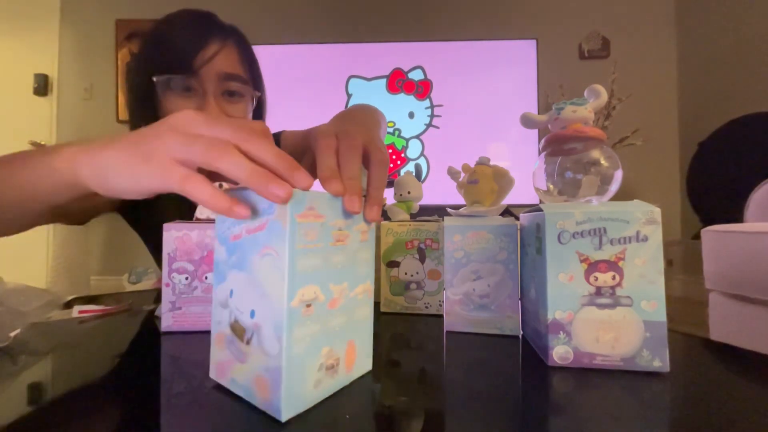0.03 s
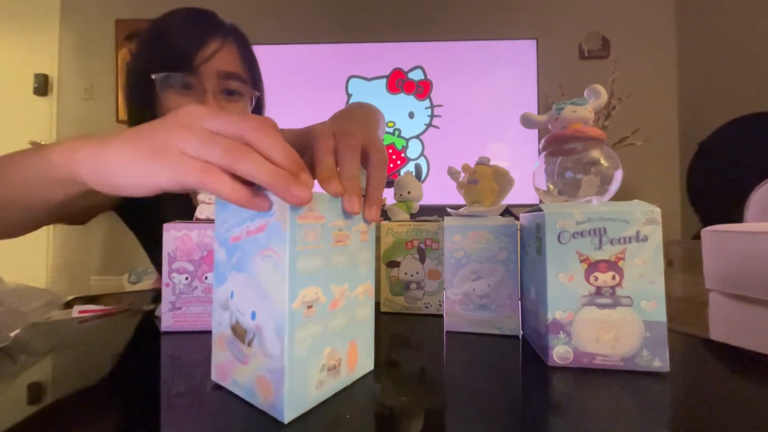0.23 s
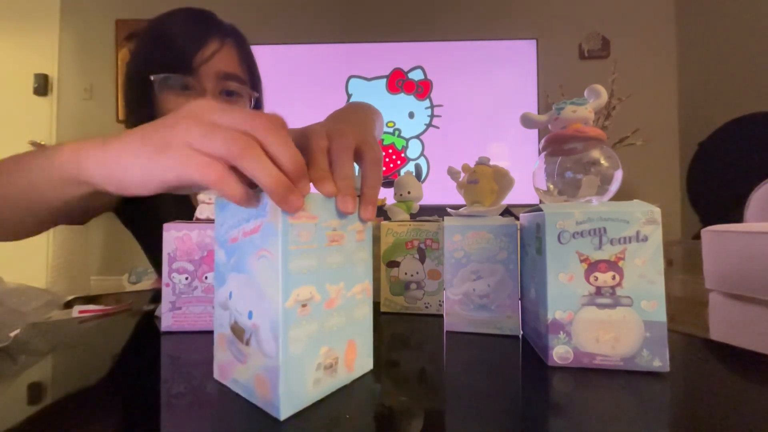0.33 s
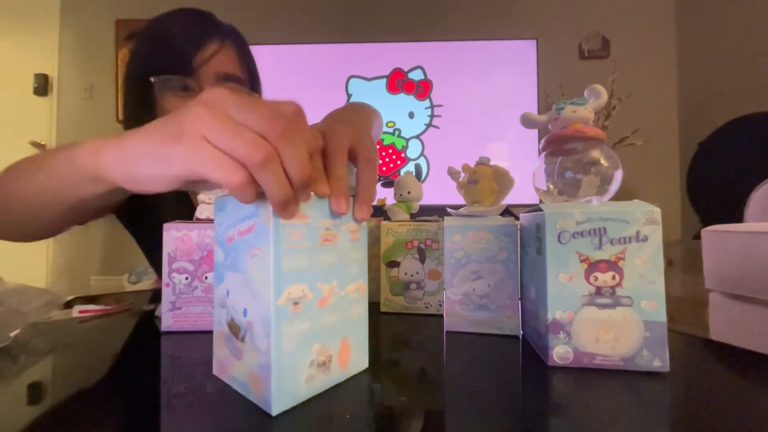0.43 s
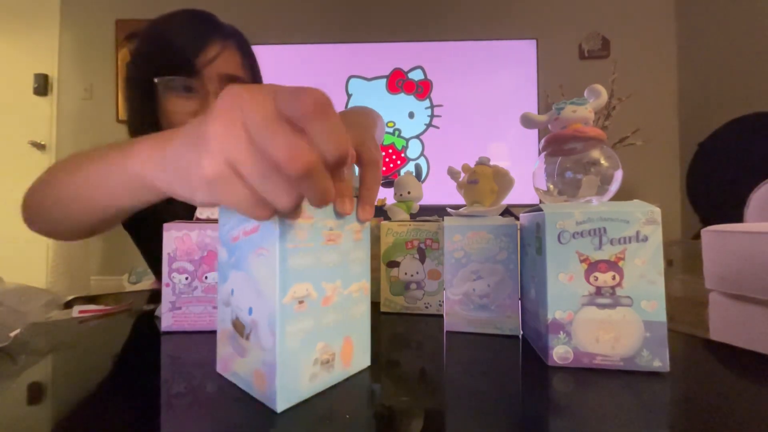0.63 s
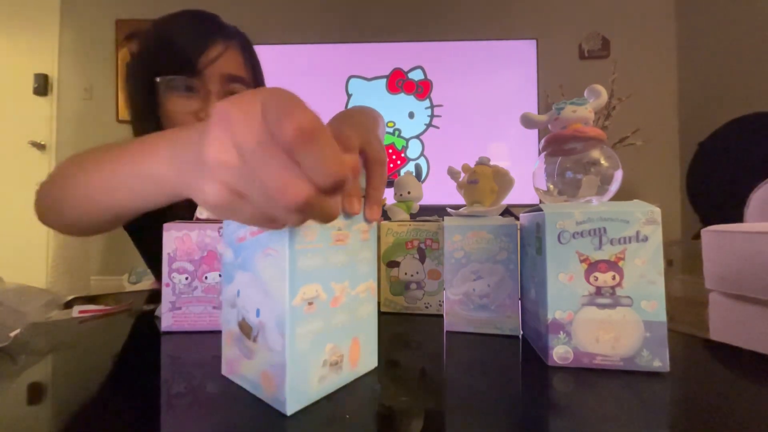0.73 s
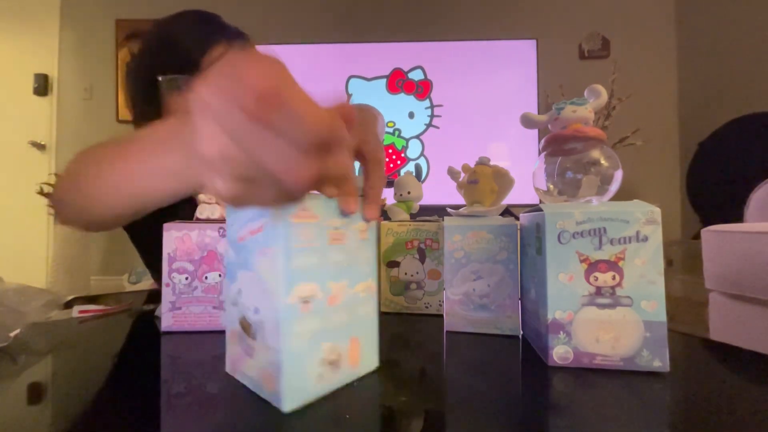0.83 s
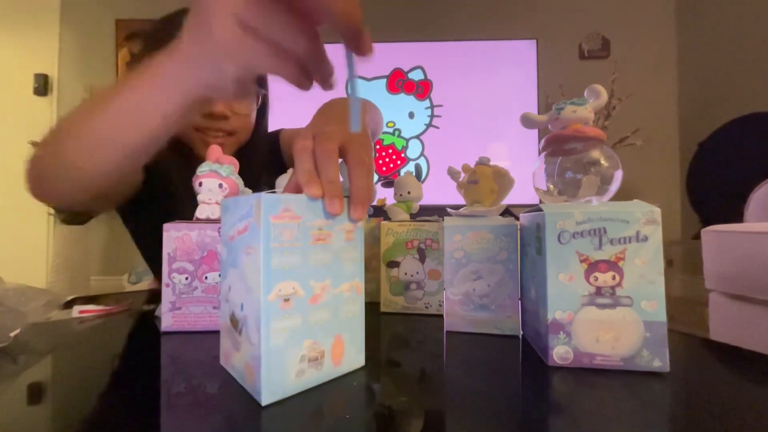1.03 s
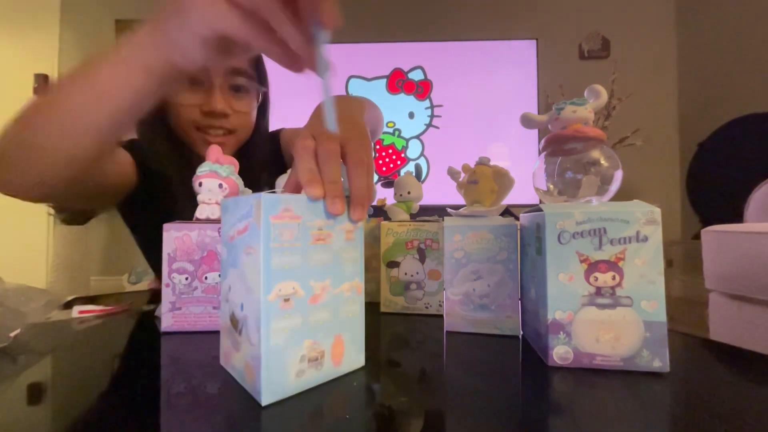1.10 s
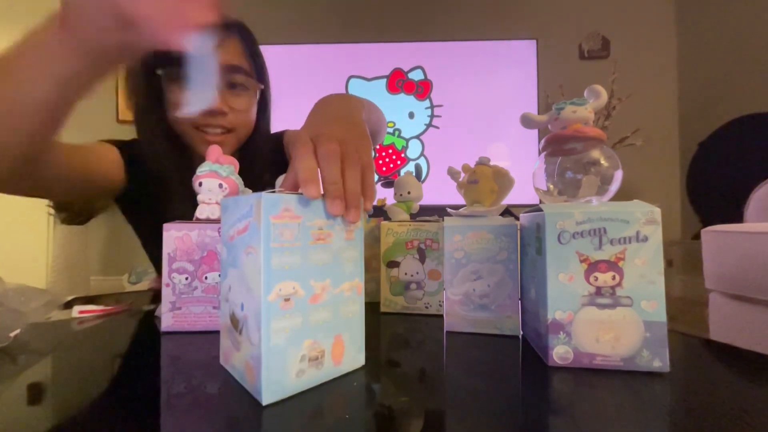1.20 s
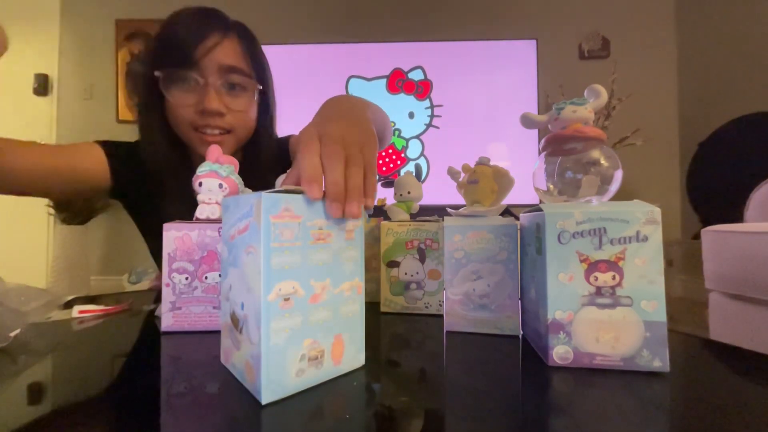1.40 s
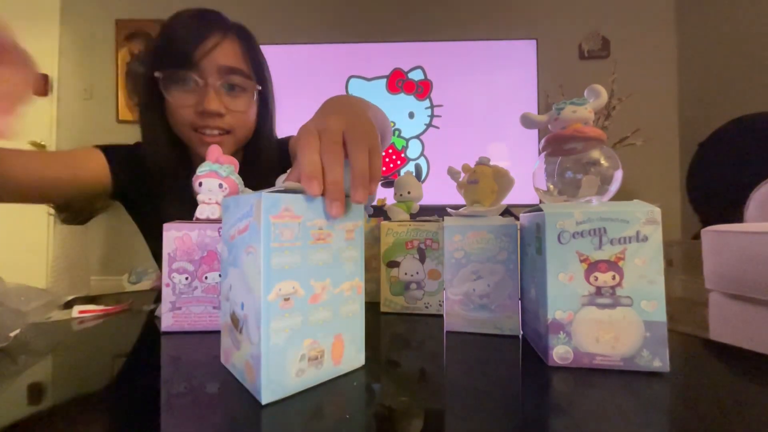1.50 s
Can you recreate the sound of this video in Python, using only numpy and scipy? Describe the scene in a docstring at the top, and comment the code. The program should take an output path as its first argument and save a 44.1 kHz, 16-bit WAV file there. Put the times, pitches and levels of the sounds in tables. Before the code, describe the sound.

Cardboard rips close to the microphone as a strip is pulled from a hollow box on a table. The tearing ends in a snap, followed by light finger taps and soft rubbing over a low room hush.

```python
"""A faint tick on card, then a close, purring rip: the pull tab tears off a small box on a table.
The strip sticks and slips about a hundred times a second; each slip thumps the hollow box while
fibres crackle. The end of the strip breaks free with a snap, then fingers tick and rub lightly
on the card over the low hush of a small room."""
import sys
import numpy as np
from scipy import signal
from scipy.fft import rfft, irfft
from scipy.io import wavfile
from scipy.ndimage import uniform_filter1d

SR = 44100
rng = np.random.default_rng(int(sys.argv[2]) if len(sys.argv) > 2 else 0)


def bounce(signal):
    """Save signal as a 16-bit WAV file at the path given by the first command-line argument."""
    frames = np.transpose(np.atleast_2d(signal))
    limited = np.clip(frames, -1, 1)
    pcm = np.round(limited * 32767).astype(np.int16)
    wavfile.write(sys.argv[1], SR, pcm)


N = 68355
T = np.arange(N) / SR

# tone of the room's air, early reflections and tail: (frequency [Hz], gain [dB])
HUSH_EQ = [(25, -16), (60, -12), (115, -8), (155, -22), (220, -15), (300, -17), (410, -22.5), (800, -33.5),
           (1350, -34), (1540, -31), (1800, -39), (2600, -51), (3900, -45), (5500, -63.5), (11600, -61),
           (14300, -70)]
EARLY_EQ = [(100, -12.5), (600, -22), (1500, -11.5), (3000, 1.5), (6000, -7.5), (12000, -10)]
TAIL_EQ = [(60, -23), (250, -14.5), (600, -15), (1200, -18), (2500, -14.5), (6000, -10.5), (12000, -7)]
# decay of the tail: (frequency [Hz], t60 [s])
TAIL_DECAY = [(100, .4), (300, 0.25), (700, 0.25), (2000, 0.4), (6000, 0.24), (12000, 0.24)]
# pan of the box: (frequency [Hz], left over right [dB])
PAN = [(60, -1), (200, -1), (370, 1.5), (520, 8), (700, 17), (1230, 6), (2260, 0), (4140, 15), (7580, -2),
       (13900, -0.5)]
# finger strokes on the card: (start [s], length [s], level [dB])
STROKES = [(1.145, 0.091, -59.5), (1.401, 0.076, -50.5), (1.483, 0.13, -53)]
# tone of skin on card: (frequency [Hz], gain [dB])
RUB_EQ = [(30, -18), (70, -4), (115, 5.5), (200, 0.5), (500, -3.5), (1000, -6.5), (2000, -16.5),
          (4000, -22), (8000, -32), (14000, -67)]
# resonances of the box: (frequency [Hz], relative level [dB], t60 [s])
BOX_MODES = [(92, -20, .11), (228, 1, 0.093), (327, -4.5, 0.043), (454, -13, .045), (535, -7, 0.057),
             (596, 6.5, 0.027), (742, 1, 0.023), (970, 4.5, 0.019), (1136, -4, 0.013), (1296, 6.5, 0.021),
             (1520, -39, 0.018), (1970, 2, 0.033), (2060, -5.5, 0.029), (3020, 1, .015), (3820, 1, 0.022)]
# hits from fingers and nails, and from bridges of card breaking along the strip:
# (time [s], gain [dB], centre [Hz], spread [octaves], crack mix [dB], thump mix [dB])
FINGER_TAPS = [(.018, -52.5, 2500, 1.2, 1, -10), (1.097, -38, 469, 0.14, -21, -18),
               (1.1405, -39.5, 790, 1.2, -20, -14), (1.145, -40, 303, 0.36, -35, -15),
               (1.1855, -38.5, 900, 0.53, -13, -15), (1.190, -42, 300, 0.65, -44, -17),
               (1.2622, -35, 1740, 0.98, -19, -32), (1.2645, -36.5, 480, 0.15, -40, -33.5),
               (1.4075, -28.5, 1700, 1.46, -17.5, -17), (1.4088, -28, 787, 0.3, -14, -23),
               (1.417, -42, 139, 0.78, -28, -1.5), (1.4265, -67, 1200, 1.3, -7, -8),
               (1.4680, -23, 1400, 1.3, -13.5, -33.5), (1.4715, -28.5, 405, 0.49, -30, -13),
               (1.499, -33.5, 610, 0.96, -19, -10), (1.526, -33, 524, 0.59, -24, -30),
               (1.546, -27.5, 2260, 0.74, -8.5, -23)]
BRIDGE_SNAPS = [(.115, -55, 900, 1, -19, -18), (.1665, -30, 890, 1.1, -6, -9),
                (.1712, -35, 455, 0.65, -9, -11), (.1932, -27.5, 500, 0.63, 0.5, -15),
                (.2345, -28.5, 800, 0.81, -4.5, -19), (.2608, -34, 800, 1.2, -23, -14),
                (.2672, -18.5, 450, 1.2, -7.5, -10.5), (.2728, -16.5, 202, 0.66, -42, -23),
                (.3488, -10, 600, 1, -18, -19), (.3645, -25, 800, 1, -15, -23),
                (.4412, -25, 1200, 1, -8, -16), (.4718, -13, 400, 0.71, -19, -9),
                (.6075, -23, 900, 0.82, -5, -33), (.6198, -18.5, 600, 1.15, -6.5, -10),
                (.8150, -19, 1700, 0.43, -9, -7), (.8182, -6, 1323, 0.44, -12, -49.5),
                (.8222, -10, 850, 0.4, -16.5, -20), (.8260, -0.5, 560, 0.8, -64, -25.5)]
# fader moves of the rip, ahead of the trims: (time [s], crackle [dB], rasp [dB], boom [dB])
RIP_FADERS = [(.1,-75,-61,-69), (.116,-55.5,-55,-58), (0.133,-57,-49,-55), (0.157,-68,-60,-56),
              (0.169,-47.5,-36.5,-68), (0.184,-53,-32.5,-32), (.196,-49.5,-32.5,-31.5),
              (.212,-73,-47.5,-45), (0.223,-62,-59.5,-46), (.238,-48,-35,-27.5), (.252,-69,-52,-57),
              (.261,-45,-29,-33), (.27,-40.5,-26,-19.5), (.286,-54,-38,-23), (0.299,-48.5,-28,-24),
              (.336,-55,-44.5,-32.5), (0.348,-36.5,-26,-24.5), (0.383,-47,-28,-21.5),
              (.428,-49.5,-37,-27.5), (.446,-46.5,-27.5,-26.5), (0.461,-46,-39.5,-32),
              (0.47,-45.5,-29.5,-23.5), (.516,-50.5,-29,-23.5), (0.535,-49,-35.5,-29.5),
              (.58,-46.5,-28.5,-21.5), (.604,-45.5,-35,-30), (.622,-49,-29,-31), (.636,-55,-41,-36.5),
              (.685,-58.5,-46.5,-39.5), (.73,-64,-47.5,-43), (.764,-71,-57,-45), (.775,-47.5,-37.5,-40),
              (.79,-61.5,-42.5,-37), (.81,-47,-39,-38.5)]
# speed of the pull: (time [s], rate [slips/s])
PULL_SPEED = [(.16, 95), (.28, 87.3), (.33, 75), (.36, 130), (.42, 109.2), (.51, 114), (.58, 85.2),
              (.66, 100), (.8, 85)]
# tone of the box's boom, the card's rasp and the fibres' crackle: (frequency [Hz], gain [dB])
BOOM_EQ = [(25, -51.5), (55, -2.5), (85, -1.5), (118, -1), (148, 1), (185, 0.5), (245, 0.5), (310, -8.5),
           (370, -16.5), (600, -34.5), (1500, -59.5)]
RASP_EQ = [(150, -19.5), (350, -4.5), (430, 2), (505, 2.5), (590, -2.5), (715, 1.5), (830, -5.5),
           (980, -12), (1270, -6), (1480, -15.5), (1720, -11.5), (2120, -14.5), (2540, -40), (5000, -54)]
CRACKLE_EQ = [(500, -31), (1800, 6.5), (2550, -2), (3300, 1), (3700, -0.5), (5200, 0), (6200, 0.5),
              (8000, -7), (10200, -14.5), (12500, -27), (14500, -57)]

HUSH_DB, EARLY_DECAY_S, RIGHT_LATE_S = -57.5, 0.0017, 0.0001
CONTACT_S, CRACK_RISE_S, CRACK_DECAY_S, THUMP_HZ, THUMP_DECAY_S = 0.00034, 0.00023, 0.0017, 96.7, 0.015
SLIP_JITTER_PERIODS, SLIP_SPREAD_DB, SLIP_DECAY_S = 0.097, 1.6, 0.0065
FIBRES_PER_S, FIBRE_SPREAD_DB, CLUMP_DB, CLUMP_S = 9000, 3.5, 2.5, 0.003
BOOM_TRIM_DB, CRACKLE_TRIM_DB, SIDE_RASP_TRIM_DB, SIDE_CRACKLE_TRIM_DB = -1.5, 0.5, -21, -10


def amp(db):
    """Decibels to gain."""
    return 10 ** (np.asarray(db) / 20)


def unit_rms(x):
    """Scales to rms 1."""
    return x / np.sqrt(np.mean(x ** 2) + 1e-20)


def curve_at(points, hz):
    """Reads a curve on a log-frequency axis."""
    f, value = np.transpose(points)
    return np.interp(np.log(hz + 1), np.log(f + 1), value)


def add(mix, start_s, sound):
    """Drops a sound into the mix."""
    part = mix[round(start_s * SR):][:len(sound)]
    part += sound[:len(part)]


def eq(x, points, size=8192):
    """Minimum-phase equaliser that follows a gain curve."""
    log_gain = np.log(amp(curve_at(points, abs(np.fft.fftfreq(size, 1 / SR)))))
    spectrum = np.exp(np.conj(signal.hilbert(log_gain)))
    impulse = np.fft.ifft(spectrum).real[:size // 2]
    return signal.fftconvolve(x, impulse)[:len(x)]


def room_hush(width=0.28):
    """The bed: a low, steady murmur of air, in stereo."""
    mid, side = (unit_rms(eq(noise, HUSH_EQ)) for noise in rng.standard_normal((2, N)))
    return amp(HUSH_DB) * np.array([mid + width * side, mid - width * side])


def room_echo(x, predelay_s=0.0025, echoes_per_s=4000):
    """Quick reflections off the table and nearby boxes, then a short tail, for one ear."""
    t = T[:SR // 2]
    near, far = rng.choice([-1., 1.], (2, len(t))) * (rng.random((2, len(t))) < echoes_per_s / SR)
    early = near * np.exp(-t / EARLY_DECAY_S)
    hz, times, bands = signal.stft(far * (t > predelay_s), SR, nperseg=256)
    decay = amp(-60 * times / curve_at(TAIL_DECAY, hz)[:, None])
    tail = signal.istft(bands * decay, SR, nperseg=256)[1][:len(t)]
    impulse = eq(early / np.linalg.norm(early), EARLY_EQ) + eq(tail / np.linalg.norm(tail), TAIL_EQ)
    return signal.fftconvolve(x, impulse)[:N]


def finger_rubs(grains_per_s=2500):
    """Fingers slide over the card in short, grainy strokes."""
    envelope = np.zeros(N)
    for start_s, length_s, db in STROKES:
        add(envelope, start_s, amp(db) * np.sqrt(np.hanning(round(length_s * SR)).clip(0)))
    grains = rng.standard_normal(N) * (rng.random(N) < grains_per_s / SR)
    return envelope * unit_rms(eq(grains, RUB_EQ))


def box_hit(db, centre_hz, octaves, crack_db, thump_db):
    """A short crack rings the box's modes around a centre pitch and rocks the box on the table."""
    t = T[:SR // 5]
    hz, mode_db, t60 = np.transpose(BOX_MODES)[:, :, None]
    weight = amp(mode_db) / (1 + (np.log2(hz / centre_hz) / octaves) ** 4)
    modes = weight * amp(-60 * t / t60) * np.sin(2 * np.pi * hz * t)
    ring = modes.sum(0) / weight.sum()
    bright_noise = unit_rms(eq(rng.standard_normal(len(t)), CRACKLE_EQ))
    crack = bright_noise * np.exp(-t / CRACK_DECAY_S) * (1 - np.exp(-t / CRACK_RISE_S)) / 2
    thump = np.sin(2 * np.pi * THUMP_HZ * t) * np.exp(-t / THUMP_DECAY_S)
    attack = 1 - np.exp(-t / CONTACT_S)
    return amp(db) * ((ring + amp(thump_db) * thump) * attack + amp(crack_db) * crack)


def box_hits(cues):
    """Lays a cue list of taps or snaps on one track."""
    track = np.zeros(N)
    for start_s, *hit in cues:
        add(track, start_s, box_hit(*hit))
    return track


def stick_slip(tearing, max_slips=120):
    """The strip catches and lets go: one impulse a slip, loose in timing and weight."""
    rate = np.interp(T, *np.transpose(PULL_SPEED))
    slip_count = np.floor(np.cumsum(rate * tearing) / SR)
    due = np.flatnonzero(np.diff(slip_count))
    slips = np.zeros(N)
    for i, (late, size) in zip(due, rng.standard_normal((max_slips, 2))):
        add(slips, T[i] + SLIP_JITTER_PERIODS * late / rate[i], amp([SLIP_SPREAD_DB * size]))
    return slips


def tab_rip():
    """Slips push the box while snapping fibres swell at each slip and scatter wide: (mid, side)."""
    times, crackle_db, rasp_db, boom_db = np.transpose(RIP_FADERS)
    tearing = (T >= times[0]) & (T < times[-1])
    slips = stick_slip(tearing)
    bursts = 1 + signal.lfilter([1], [1, -np.exp(-1 / (SLIP_DECAY_S * SR))], slips)
    flicker = unit_rms(uniform_filter1d(rng.standard_normal(N), round(CLUMP_S * SR)))
    clumps = amp(CLUMP_DB * flicker)

    def fibres():
        """A fresh spray of snapping fibres, uneven in size."""
        sizes = amp(FIBRE_SPREAD_DB * np.minimum(rng.exponential(1, N), 4)) * rng.choice([-1, 1], N)
        breaks = rng.random(N) < FIBRES_PER_S / SR
        return unit_rms(sizes * breaks * bursts * tearing)

    def layer(drive, tone, fader_db):
        """Rides the fader on a drive, then shapes its tone with the EQ's gain evened out."""
        ridden = drive * amp(np.interp(T, times, fader_db))
        return eq(ridden, tone) / eq(drive, tone)[tearing].std()

    push = -unit_rms(slips)
    boom = layer(push + 0.32 * fibres(), BOOM_EQ, boom_db + BOOM_TRIM_DB)  # mostly pulse
    rasp = layer(fibres() + 0.27 * push, RASP_EQ, rasp_db)  # mostly grain
    crackle = layer(clumps * fibres(), CRACKLE_EQ, crackle_db + CRACKLE_TRIM_DB)
    side_rasp = layer(fibres(), RASP_EQ, rasp_db + SIDE_RASP_TRIM_DB)
    side_crackle = layer(clumps * fibres(), CRACKLE_EQ, crackle_db + SIDE_CRACKLE_TRIM_DB)
    return boom + rasp + crackle, side_rasp + side_crackle


def scene():
    """Rip, snaps and fingers sit close and a little to the left, with the room around them."""
    rip, side = tab_rip()
    stems = [rip, box_hits(BRIDGE_SNAPS), box_hits(FINGER_TAPS) + finger_rubs()]
    hz = np.fft.rfftfreq(2 * N, 1 / SR)
    left_gain = amp(curve_at(PAN, hz))
    right_delay = np.exp(-2j * np.pi * hz * RIGHT_LATE_S)
    ears = np.array([left_gain, right_delay]) * 2 / (1 + left_gain)
    direct = irfft(rfft(sum(stems), 2 * N) * ears)[:, :N]
    echoes = sum(np.array([room_echo(stem), room_echo(stem)]) for stem in stems)
    return direct + np.array([side, -side]) + echoes + room_hush()


def record(dry, low_cut_hz=59.5, high_cut_hz=14480):
    """Rolls off the rumble and cuts the very top steeply."""
    low_cut = signal.butter(2, low_cut_hz, "high", fs=SR, output="sos")
    high_cut = signal.firwin(255, high_cut_hz, window=("kaiser", 9), fs=SR)
    return signal.oaconvolve(signal.sosfilt(low_cut, dry), high_cut[None], "same")


dry = scene()
out = record(dry)
bounce(out)
```